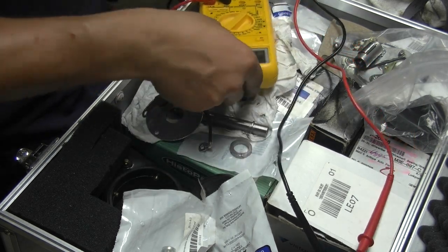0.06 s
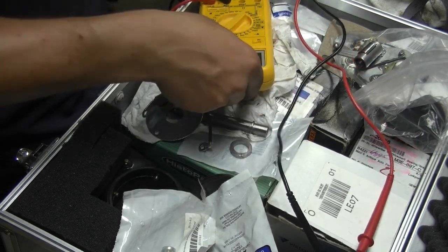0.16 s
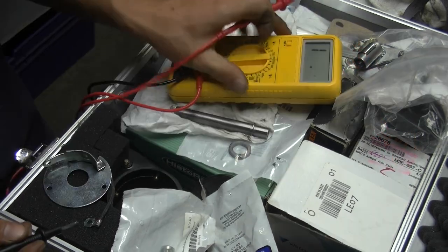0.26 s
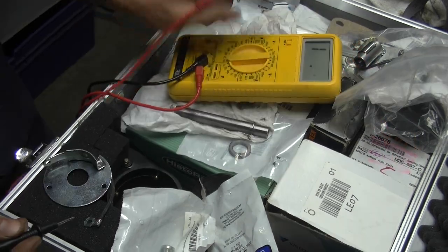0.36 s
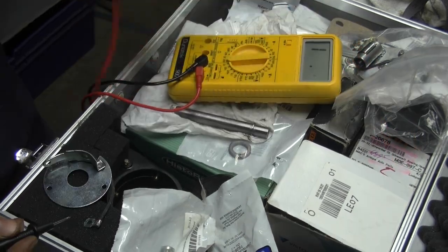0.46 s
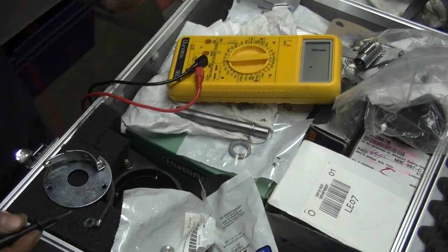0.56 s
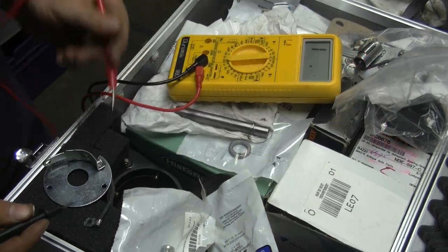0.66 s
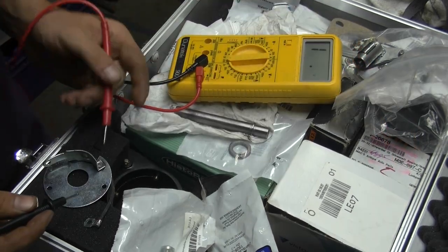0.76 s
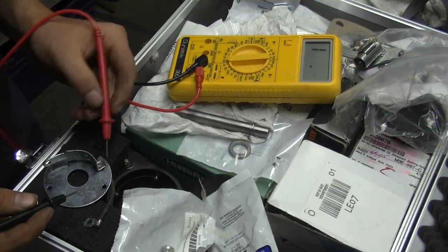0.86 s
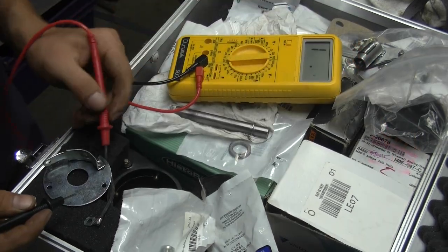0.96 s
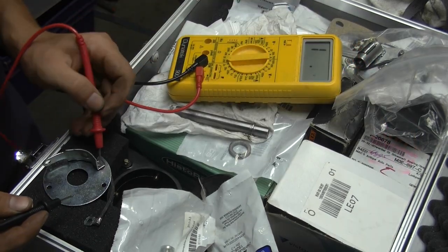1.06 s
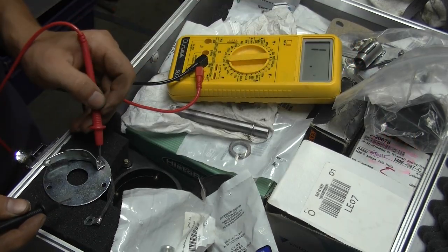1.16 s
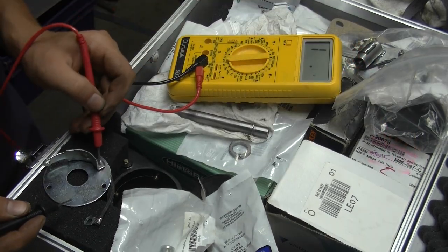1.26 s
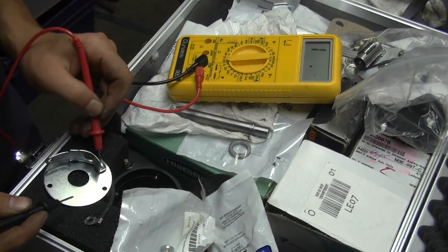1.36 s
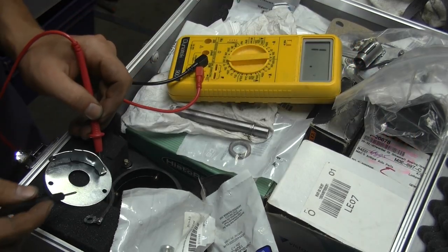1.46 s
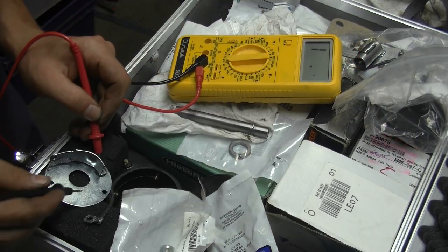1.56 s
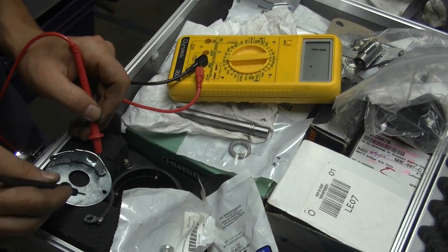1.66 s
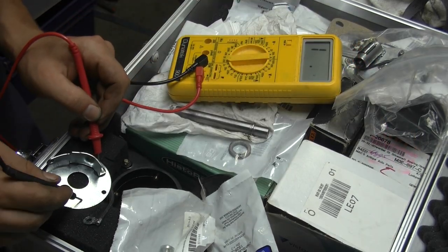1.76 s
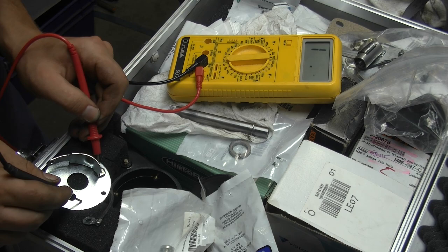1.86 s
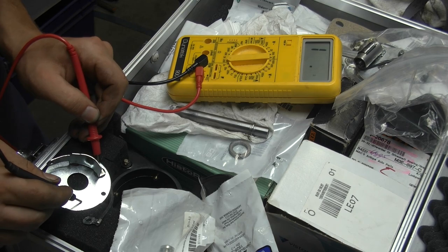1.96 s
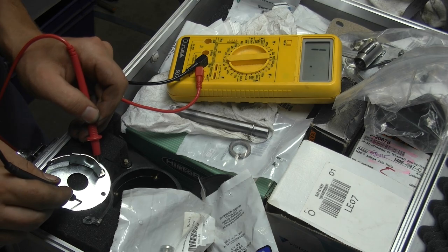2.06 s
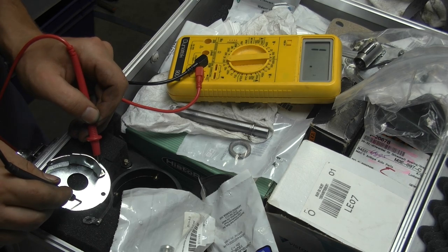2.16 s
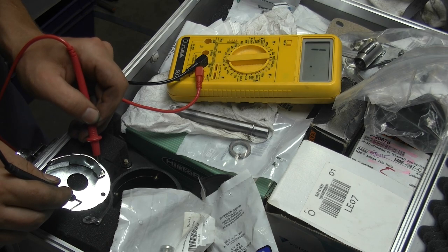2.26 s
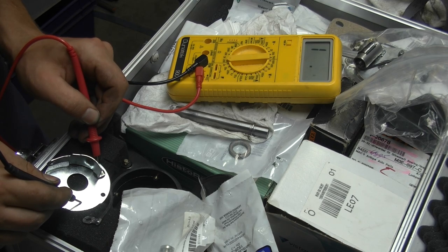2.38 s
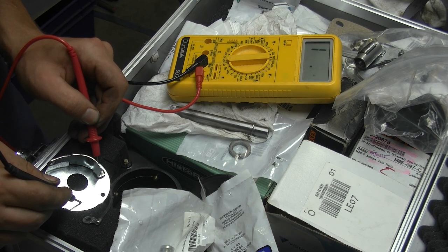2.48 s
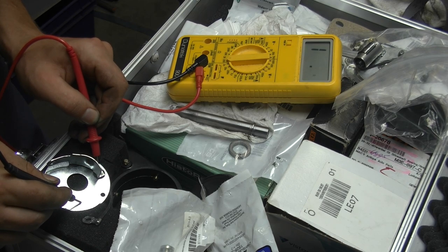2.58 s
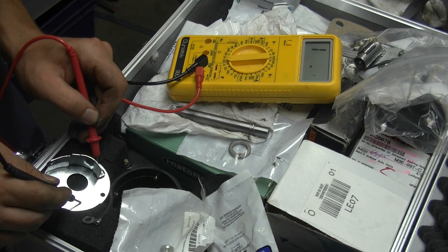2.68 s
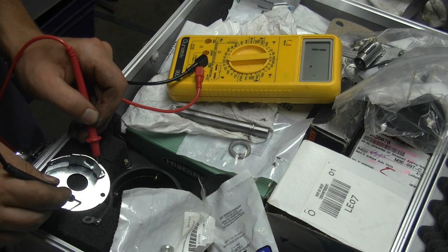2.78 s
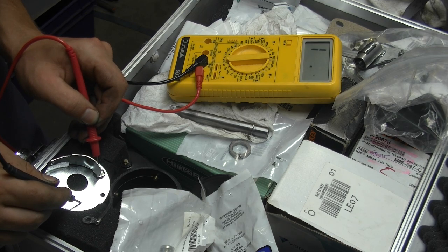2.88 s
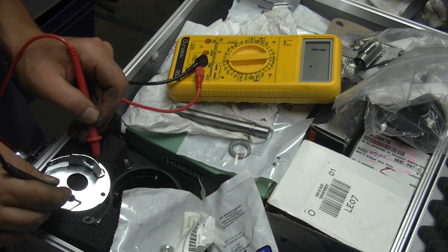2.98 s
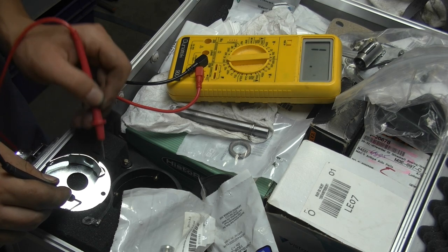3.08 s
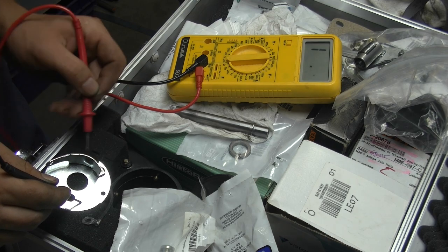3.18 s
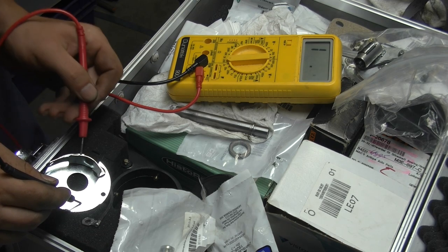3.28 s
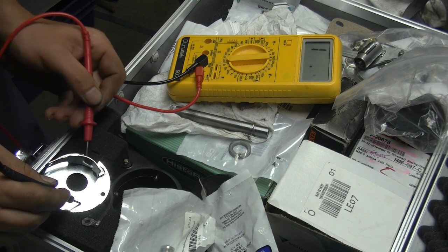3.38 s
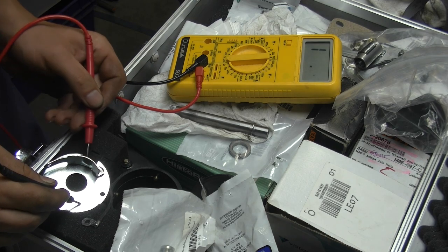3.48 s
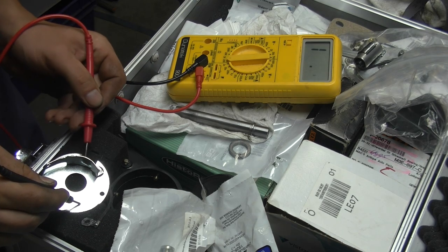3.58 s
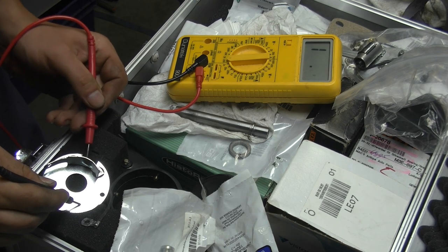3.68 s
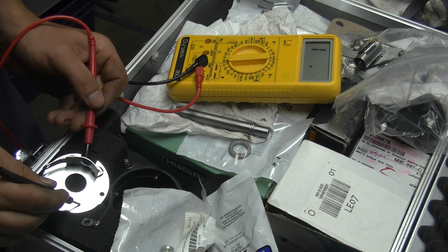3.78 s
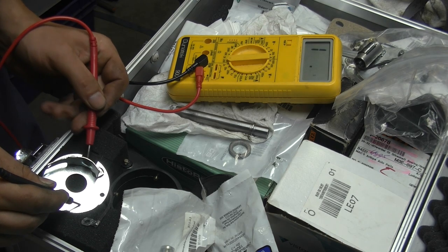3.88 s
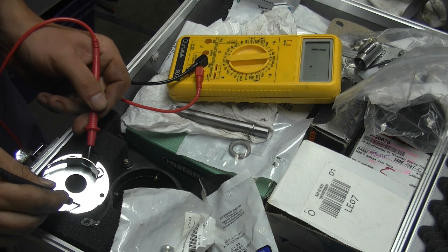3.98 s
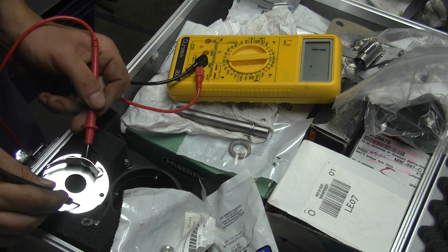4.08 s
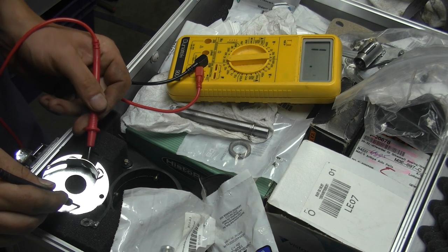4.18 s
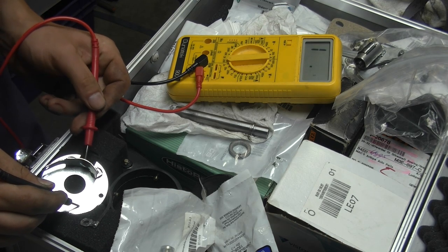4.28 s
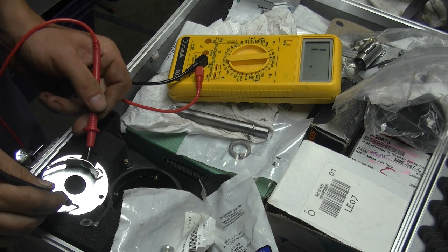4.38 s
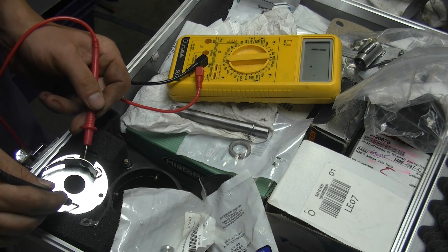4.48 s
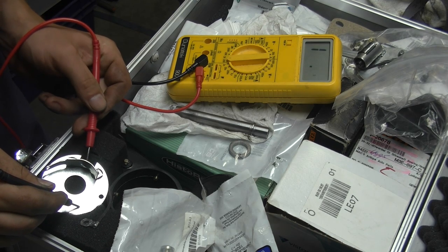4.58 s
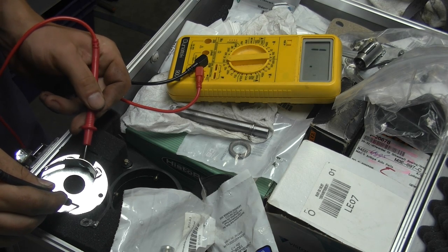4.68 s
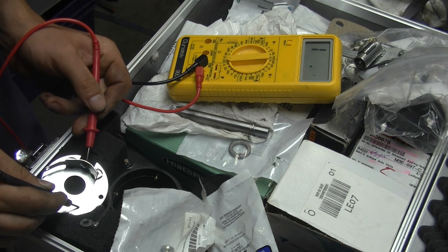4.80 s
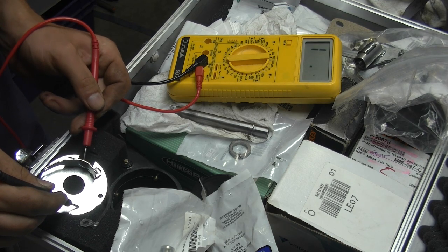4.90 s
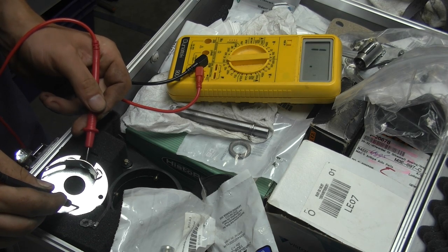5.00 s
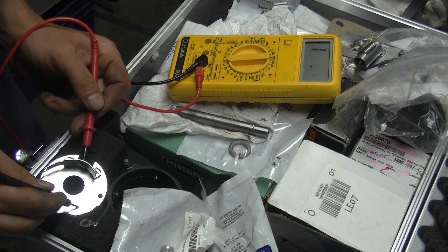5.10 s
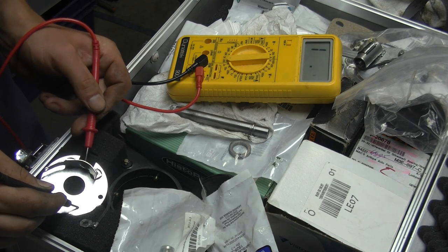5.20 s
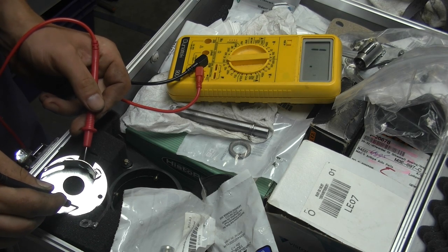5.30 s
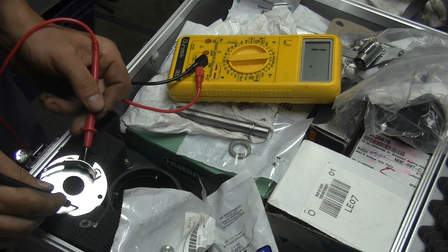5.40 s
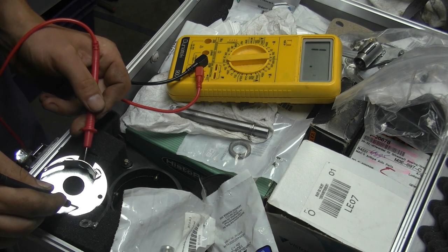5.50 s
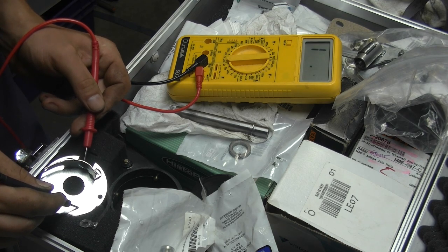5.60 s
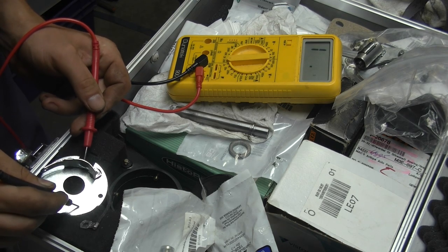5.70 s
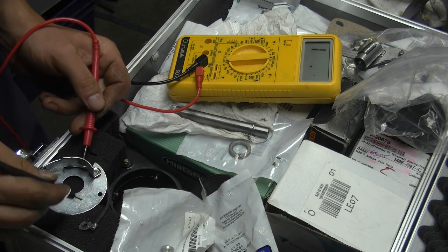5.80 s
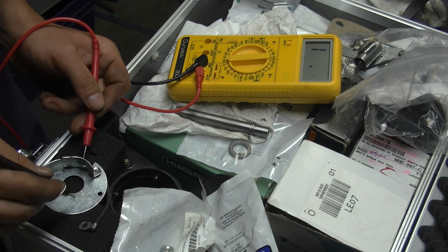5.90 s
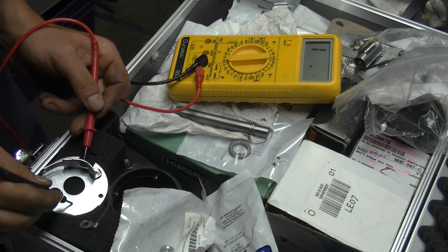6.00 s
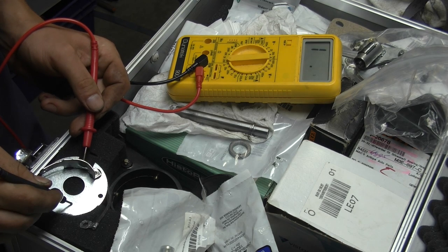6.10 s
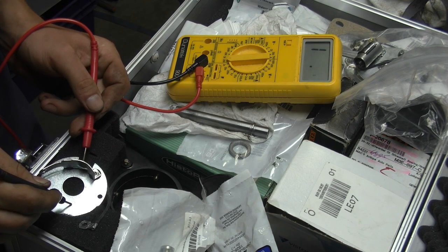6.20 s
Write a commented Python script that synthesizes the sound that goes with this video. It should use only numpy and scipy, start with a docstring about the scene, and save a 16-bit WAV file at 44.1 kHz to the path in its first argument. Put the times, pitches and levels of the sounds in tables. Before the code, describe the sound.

A handheld plastic meter clatters down and rocks to rest on a cluttered case, probe tips tick and scrape on metal, then a sharp snap.

```python
"""First comes a short clatter: a handheld meter is set down on a cluttered tool case and rocks to rest.
Impulses excite damped modes and coloured noise; evenly spaced landings push air, and a loose part ticks.
Two steel probe tips then tap, scrape and fidget on a small metal plate: random slips ring plate, handle
and needle. One loud snap ends it. Plastic knocks, scuffs and rustling accompany the close, nearly mono
scene, in a small room with filtered-noise air that swells slowly and dips at the snap."""
import sys
import numpy as np
from scipy import signal
from scipy.io import wavfile

SR = 44100
rng = np.random.default_rng(int(sys.argv[2]) if len(sys.argv) > 2 else 0)


def put_to_file(sound):
    """Save the sound as 16-bit audio at rate SR, in the file named by the first command-line argument."""
    columns = np.atleast_2d(sound).T  # one column per channel
    safe = np.clip(columns, -1, 1)
    whole_steps = np.round(safe * 32767)
    wavfile.write(sys.argv[1], SR, whole_steps.astype(np.int16))


N = 275625  # samples
T = np.arange(SR // 2) / SR  # time after a blow, s

# Levels are dB re full scale; those of modes and spectra are relative, since energy is normalised later.
# Modes of the meter on the case: pitch_hz [Hz], level_db [dB], t60_s [s]
CASE_MODES = [(248, 1, .26), (425, -6, .08), (501, 1, .12), (608, -12, .2), (705, -11, .09),
              (807, -17, .25), (904, -9, .13), (985, -14, .14), (1150, -8, .07), (1244, -13, .2),
              (1460, -6, .06), (1723, -5, .08), (2350, -7, .04)]
# Modes of its rocking edge: pitch_hz [Hz], level_db [dB], t60_s [s]
EDGE_MODES = [(111, -12, 0.15), (160, -7, 0.16), (271, -1.5, 0.045), (417, -4, 0.079), (516, 2.5, 0.032),
              (600, 3, 0.017), (1145, -16.5, 0.03)]
# Modes of the loose part: pitch_hz [Hz], level_db [dB], t60_s [s]
LOOSE_PART_MODES = [(5010, 4, 0.025), (5740, -4, .01), (6900, -18, 0.0098)]
# Spectrum of the opening clatter: frequency_hz [Hz], density_db [dB per Hz]
CLATTER_SPECTRUM = [(35, -26), (60, -24), (170, -7.5), (209, -7), (289, -1), (381, -15), (491, -7.5),
                    (539, -9), (663, -13.5), (1100, -23), (2470, -26.5), (8420, -38), (15000, -57)]
# Spectrum of the meter's drop: frequency_hz [Hz], density_db [dB per Hz]
THUD_SPECTRUM = [(24, -13), (45, -4), (230, -0.5), (370, -0.5), (500, -3), (1000, -7), (1600, -9.5),
                 (2000, -11), (2600, -11), (3100, -18.5), (4800, -21.5), (5900, -28.5), (8500, -31),
                 (15000, -52)]

# A probe tip touches metal: start_s [s], slide_s [s], plate_db [dB before the plate trim], needle_db [dB]
TIP_CONTACTS = [(0.324, .001, -54, -48), (1.3299, 0.0045, -47, -54), (1.343, 0.0044, -52, -34.5),
                (1.8043, 0.00065, -47, -26), (3.092, 0.0075, -61.5, -51), (3.3177, 0.0009, -47, -64),
                (3.778, 0.004, -51, -58), (3.94, 0.028, -56.5, -55.5), (4.181, 0.021, -55.5, -63),
                (4.2152, 0.0032, -44, -49.5), (4.599, .0068, -59, -54), (4.727, 0.0063, -56, -50.5),
                (5.307, 0.006, -52.5, -60), (5.4037, 0.0065, -47, -52.5), (5.7924, 0.0056, -48, -50),
                (5.8171, 0.0065, -44.5, -37.5)]
# Pressure of one long scrape across the plate: time_s [s], pressure_db [dB before the scrape trim]
SCRAPE_PRESSURE = [(3.31, -68), (3.316, -46.5), (3.394, -62), (3.402, -49), (3.436, -44), (3.466, -51.5),
                   (3.512, -57), (3.53, -73)]
# Modes of the metal plate: pitch_hz [Hz], level_db [dB], t60_s [s]
PLATE_MODES = [(875, -5.5, 0.027), (1390, -3.5, 0.026), (1865, -10, 0.079), (2460, 2.5, 0.012),
               (2833, 3.5, 0.023), (3660, -12, 0.073), (4870, -22, 0.079), (6170, -9.5, 0.035),
               (6800, -8.5, 0.045), (9100, -14, 0.028)]
# Modes of the probe's handle under a tap: pitch_hz [Hz], level_db [dB], t60_s [s]
HANDLE_MODES = [(3364, -9, 0.024), (3526, -3, 0.01), (5000, -21, 0.015)]
# Modes of the steel needle: pitch_hz [Hz], level_db [dB], t60_s [s]
NEEDLE_MODES = [(6120, -16, 0.084), (7200, -2, 0.01), (7150, -31, 0.0043), (7950, 7.5, 0.019),
                (7730, -23, 0.089), (9250, -25, 0.051), (10750, -18, 0.033), (13780, -17, 0.064)]

# Spectrum of the snap's crack: frequency_hz [Hz], density_db [dB per Hz]
CRACK_SPECTRUM = [(60, -20.5), (170, -6.5), (330, 2), (560, -10.5), (1100, -2), (2000, -9.5), (2800, -5.5),
                  (3700, -3.5), (5700, -7), (6250, 1), (9400, -1), (11000, -2), (12000, -16), (16000, -19)]
# Spectrum of the snap's tail: frequency_hz [Hz], density_db [dB per Hz]
SNAP_TAIL_SPECTRUM = [(100, -28.5), (250, -8), (600, -5.5), (2000, -10), (4000, -8), (4700, -1), (6800, 1),
                      (8000, -5), (9400, -5), (11500, -13), (16000, -22)]
# Modes that ring on after the snap: pitch_hz [Hz], level_db [dB], t60_s [s]
SNAP_MODES = [(248, -2, .17), (330, 4, .05), (440, 3, .045), (980, -11, .07), (1150, 4, .025),
              (2790, -1, .09), (4424, -7, .16), (5560, -12, .28), (6300, -9, .24), (6850, -8, .22),
              (8000, -9, .17), (9260, -2, .16), (10900, -10, .1)]

# Handles and plugs knock on the clutter: start_s [s], length_s [s], click_db, thump_db [dB before trim]
PLASTIC_KNOCKS = [(0.1442, 0.0031, -43, -29.5), (0.2286, 0.0012, -42, -46), (.4924, 0.0046, -42, -44),
                  (.758, 0.0048, -36, -32), (0.898, 0.0044, -40.5, -43.5), (5.805, 0.0014, -38, -41.5)]
# Modes of a knocked plastic handle: pitch_hz [Hz], level_db [dB], t60_s [s]
PLASTIC_MODES = [(1494, -1, 0.037), (2250, 5, 0.017), (2830, 3.5, 0.021), (3440, 2, 0.019),
                 (4040, -10, .045)]
# Fingers and leads scuff the bench: start_s [s], length_s [s], rub_db, thump_db [dB before trim]
BENCH_SCUFFS = [(2.74, .016, -52.5, -59), (3.128, .0095, -52, -47.5), (3.74, 0.016, -49, -54),
                (4.742, 0.013, -47.5, -52), (4.782, 0.029, -48.5, -39.5), (5.742, 0.032, -51.5, -51),
                (5.895, .006, -51.5, -70)]
# Sleeve and leads rustle: start_s [s], length_s [s], level_db [dB at start], fade_db_per_s [dB/s]
RUSTLE_MOVES = [(0, 0.228, -36, 52), (0.419, .66, -50.5, 7)]
# Spectrum of rubbing cloth and cable: frequency_hz [Hz], density_db [dB per Hz]
RUSTLE_SPECTRUM = [(20, -9), (70, 0), (130, -3.5), (300, 1.5), (700, -3.5), (2500, -16), (8000, -24),
                   (16000, -49)]

# Decay of the room: frequency_hz [Hz], t60_s [s]
ROOM_DECAY = [(100, 0.68), (400, 0.3), (1000, 0.47), (3000, 0.16), (7000, 0.3), (15000, 0.23)]
# Spectrum of the room's air noise: frequency_hz [Hz], density_db [dB per Hz]
AIR_SPECTRUM = [(12, -32), (20, -5), (38, -11), (65, -9), (91, -6), (142, -0.5), (310, -4), (347, -2.5),
                (2140, -15), (3530, -17.5), (4420, -18.5), (7950, -21), (9670, -22), (14700, -24),
                (16000, -29)]
# Spectrum of the hiss between channels: frequency_hz [Hz], density_db [dB per Hz]
HISS_SPECTRUM = [(30, -18), (120, -15.0), (500, -6), (2000, -13.5), (4000, -9.5), (8000, -7.0),
                 (10500, -3.5), (15500, -11.5)]

# The rocking keeps its swing for a while, then dies away; one landing (counted from 0) is hardest.
ROCK_START_S, ROCK_PERIOD_S, ROCK_HOLD_S, ROCK_FADE_DB_PER_S = 0.3725, 0.076, 0.35, 43
PUSH_PEAK_DB, LANDING_DB, HARDEST_LANDING, HARDEST_EXTRA_DB = -18.5, -29.5, 4, 4.5
# The loose part ticks between landings, loudest near the peak time.
RATTLE_START_S, RATTLE_PERIOD_S = 0.4055, 0.0747
RATTLE_DB, RATTLE_PEAK_S, RATTLE_FADE_DB_PER_S = -41.5, 0.48, 69
HANDLE_DB = -2.5  # relative to the plate
FIDGET_FROM_S, FIDGET_TO_S, FIDGET_SLIDE_S = 3.82, 5.3, 0.017
FIDGET_DB = -58.5  # before the plate trim
KNOCK_HZ, KNOCK_HISS_DB = 2390, -13.5  # centre of the click; hiss relative to it
SCUFF_HZ, SCUFF_HISS_DB = 2810, -2  # centre of the rub; hiss relative to it
SCUFF_DULLING = 0.55  # dB of hiss lost per dB by which the thump exceeds the rub
SNAP_S = 6.0288
# AIR_DB is the level before the swell and the dip.
AIR_DB, SWELL_DB, SWELL_FROM_S, SWELL_TO_S = -55, 6, 2.35, 4.48
DIP_DB, DIP_RECOVER_S = 14.5, 0.35  # recovery is an exponential time constant
EDGE_HZ = 16200  # upper limit of the band


def meter(clatter_db=-21, thud_db=-16, case_db=-19.0, settle_db=-24):
    """Impact excitation: clutter rings as the meter is lifted, then it drops with a quick second contact."""
    out = np.zeros(N)
    clatter = colour(burst(0.16) + 0.5 * burst(0.3), CLATTER_SPECTRUM)
    add(out, 0, sized(clatter, clatter_db))
    blow = 0.25 * signal.unit_impulse(len(T)) + burst(0.05)
    add(out, 0.2612, sized(colour(blow, THUD_SPECTRUM), thud_db))
    add(out, 0.2612, sized(ring(CASE_MODES), case_db))
    settling = burst(0.027) + 0.7 * burst(0.42)
    add(out, 0.2712, sized(colour(settling, THUD_SPECTRUM), settle_db))
    return out


def air_push(lead_s=0.0051, squeeze_s=0.0028, rebound=0.27, sway_hz=52, sway_t60=0.038):
    """Displaced air: a pressure hump just before landing, then a damped rebound; landing is at t = 0."""
    t = T - 0.05
    hump = np.exp(-((t + lead_s) / squeeze_s) ** 2)
    sway = (t > 0) * gain_of(-60 * abs(t) / sway_t60) * np.sin(2 * np.pi * sway_hz * t)
    push = band(hump - rebound * sway, 13.0, 400, order=1)
    return t[0], push / abs(push).max()


def rocking(roll_s=0.0059, count=9):
    """Periodic impacts: each landing squeezes out air and knocks, and a loose part ticks in between."""
    out = np.zeros(N)
    push_offset_s, push = air_push()
    for k, s in enumerate(ROCK_START_S + ROCK_PERIOD_S * np.arange(count)):
        swing_db = -ROCK_FADE_DB_PER_S * max(s - ROCK_START_S - ROCK_HOLD_S, 0)
        knock_db = LANDING_DB + swing_db + HARDEST_EXTRA_DB * (k == HARDEST_LANDING)
        add(out, s + push_offset_s, gain_of(PUSH_PEAK_DB + swing_db) * push)
        # the edge rolls down over crumpled bags
        edge = signal.unit_impulse(len(T)) + 1.2 * unit(slips(roll_s))
        knock = through(edge, ring(EDGE_MODES)) + 0.5 * unit(band(burst(0.065), 304, 680))
        add(out, s, sized(knock, knock_db))
    for s in RATTLE_START_S + RATTLE_PERIOD_S * np.arange(count // 2):
        tick = through(unit(slips(0.0024)), ring(LOOSE_PART_MODES))
        tick = tick + 0.77 * unit(band(burst(0.016), 1300, 6600))
        tick_db = RATTLE_DB - RATTLE_FADE_DB_PER_S * abs(s - RATTLE_PEAK_S)
        add(out, s, sized(tick, tick_db))
    return out


def probes(plate_trim_db=2):
    """Stick-slip into resonators: the same slips ring plate, handle and needle, each with a dry tick."""
    out = np.zeros(N)
    plate = ring(PLATE_MODES) + 0.33 * unit(band(burst(0.015), 1500, 3300))
    handle = ring(HANDLE_MODES) + 0.35 * unit(band(burst(0.008), 1800, 4200))
    needle = ring(NEEDLE_MODES) + 0.19 * unit(band(burst(0.04), 4200, 11000))
    for s, slide_s, press_db, needle_db in TIP_CONTACTS + fidgets():
        drive = slips(slide_s)
        plate_db = press_db + plate_trim_db
        for body, db in [(plate, plate_db), (handle, plate_db + HANDLE_DB), (needle, needle_db)]:
            add(out, s, sized(through(drive, body), db, slide_s))
    return out + scrape(needle)


def fidgets(count=14):
    """Intermittent friction: the held tip slips faintly at uneven times, as rows like TIP_CONTACTS."""
    step = (FIDGET_TO_S - FIDGET_FROM_S) / count
    rows = []
    for k, (when, slide) in enumerate(rng.random((count, 2))):
        start_s = FIDGET_FROM_S + (k + when) * step
        rows.append((start_s, FIDGET_SLIDE_S * (0.5 + slide), FIDGET_DB, FIDGET_DB))
    return rows


def scrape(needle, trim_db=1, needle_db=-9, per_s=1300):
    """Sliding friction: a stream of slips follows the tip's pressure and rings mostly the plate."""
    times, pressure_db = np.transpose(SCRAPE_PRESSURE)
    chance = per_s / SR
    grains = rng.standard_normal(N) * (rng.random(N) < chance) / np.sqrt(chance)
    pressure = np.interp(np.arange(N) / SR, times, gain_of(pressure_db + trim_db), left=0, right=0)
    return through(grains * pressure, ring(PLATE_MODES) + gain_of(needle_db) * unit(needle))


def snap(crack_db=-14.0, tail_db=-32, plate_db=-32, ring_db=-30, ring_room=0.3):
    """Broadband excitation: a hard crack at the tip rings plate and case, and leaves a bright tail."""
    out = np.zeros(N)
    crack = 0.39 * signal.unit_impulse(len(T)) + band(burst(0.019), 1230, 20000)
    add(out, SNAP_S, sized(colour(crack, CRACK_SPECTRUM), crack_db))
    add(out, SNAP_S, sized(colour(burst(0.43), SNAP_TAIL_SPECTRUM), tail_db))
    add(out, SNAP_S, sized(ring(PLATE_MODES), plate_db))
    ringing = ring(SNAP_MODES)
    add(out, SNAP_S, sized(ringing + ring_room * room(ringing), ring_db))
    return out


def handling(trim_db=-1.5, plastic_db=-5):
    """Contact noise: knocks click and ring the plastic; scuffs only rub, duller where the thump dominates."""
    out = np.zeros(N)
    for s, length_s, click_db, thump_db in PLASTIC_KNOCKS:
        add(out, s, chatter(length_s, KNOCK_HZ, thump_db, click_db, click_db + KNOCK_HISS_DB))
        ringing = through(slips(length_s), ring(PLASTIC_MODES))
        add(out, s, sized(ringing, click_db + plastic_db, length_s))
    for s, length_s, rub_db, thump_db in BENCH_SCUFFS:
        hiss_db = rub_db + SCUFF_HISS_DB - SCUFF_DULLING * max(thump_db - rub_db, 0)
        add(out, s, chatter(length_s, SCUFF_HZ, thump_db, rub_db, hiss_db))
    return gain_of(trim_db) * out


def chatter(length_s, hz, low_db, middle_db, high_db, swell=0.29, die=0.99, shortest_s=0.00057, spread=1.51):
    """Three-band noise for soft contact: brief ones start sharply, long ones swell and fade."""
    attack = 1 - np.exp(-T / (swell * length_s))
    shape = attack * np.exp(-T / (die * length_s + shortest_s))
    bands = [(240, 1450, low_db), (hz / spread, hz * spread, middle_db), (4200, 8600, high_db)]
    out = np.zeros(len(T))
    for lo, hi, db in bands:
        out += sized(band(shape * rng.standard_normal(len(T)), lo, hi, order=3), db, length_s)
    return out


def rustle(release_s=0.03):
    """Friction noise of cloth and cable: each move fades slowly, then stops."""
    out, t = np.zeros(N), np.arange(N) / SR
    for s, length_s, db, fade_db_per_s in RUSTLE_MOVES:
        shape = gain_of(db - fade_db_per_s * t) * np.exp(-np.maximum(t - length_s, 0) / release_s)
        rubbing = np.sqrt(N) * unit(colour(rng.standard_normal(N), RUSTLE_SPECTRUM))
        add(out, s, shape * rubbing)
    return out


def room(x, build_s=0.0034):
    """Diffuse reverberation: convolution with a noise tail whose bands each decay at their own rate."""
    hz, t, z = signal.stft(rng.standard_normal(len(T)), SR, nperseg=256)
    decay = gain_of(-60 * t / read(ROOM_DECAY, hz)[:, None])
    tail = signal.istft(z * decay, SR, nperseg=256)[1][:len(T)]
    return through(x, unit(tail * (1 - np.exp(-T / build_s))))


def air(waver_db=1.22, rumble_db=-61):
    """Filtered noise that swells slowly, dips at the snap, recovers and wavers slightly, over deep rumble."""
    t = np.arange(N) / SR
    knots = np.linspace(0, t[-1], num=90)
    waver = waver_db * np.interp(t, knots, rng.standard_normal(len(knots)))
    noise = unit(colour(rng.standard_normal(N), AIR_SPECTRUM))
    rumble = unit(band(rng.standard_normal(N), 10.96, 15.8, order=4))
    level_db = AIR_DB + air_swell() + waver
    return np.sqrt(N) * (gain_of(level_db) * noise + gain_of(rumble_db) * rumble)


def air_swell():
    """Slow level modulation in dB: one rise, then a dip at the snap that recovers exponentially."""
    t = np.arange(N) / SR
    rise = np.clip((t - SWELL_FROM_S) / (SWELL_TO_S - SWELL_FROM_S), 0, 1)
    dip = (t > SNAP_S) * np.exp(-abs(t - SNAP_S) / DIP_RECOVER_S)
    return SWELL_DB * rise - DIP_DB * dip


def ring(modes):
    """Modal superposition: exponentially damped sines, neighbours swinging in opposite senses."""
    out = np.zeros(len(T))
    for k, (hz, db, t60) in enumerate(modes):
        out += (-1) ** k * gain_of(db - 60 * T / t60) * np.sin(2 * np.pi * hz * T)
    return unit(out)


def burst(t60):
    """Exponentially decaying noise of energy 1, a dense dying chatter."""
    return unit(rng.standard_normal(len(T)) * gain_of(-60 * T / t60))


def slips(slide_s, per_s=4000, release_s=0.0045, touch=2.8):
    """Stick-slip excitation: a first touch, then tiny uneven slips that die away after the slide."""
    grains = rng.standard_normal(len(T)) * (rng.random(len(T)) < per_s / SR)
    grains *= np.exp(-np.maximum(T - slide_s, 0) / release_s)
    grains *= np.minimum(slide_s / 0.0066, 1) ** 2  # short slides slip more weakly
    grains[0] = touch
    return grains


def gain_of(db):
    """Logarithmic level: decibels to amplitude."""
    return 10 ** (np.asarray(db) / 20)


def unit(x):
    """Energy normalisation: scales a sound to energy 1."""
    return x / np.sqrt(np.sum(x ** 2) + 1e-20)


def sized(x, db, length_s=0):
    """Energy as power times duration: a steady level db held for the length plus 10 ms."""
    return gain_of(db) * unit(x) * np.sqrt((length_s + 0.01) * SR)


def read(points, hz):
    """Linear interpolation of a table on a logarithmic frequency axis."""
    f, value = np.transpose(points)
    return np.interp(np.log(hz + 1), np.log(f + 1), value)


def add(mix, s, sound):
    """Superposition: adds a sound into the mix at s seconds, cut at the end."""
    part = mix[round(s * SR):][:len(sound)]
    part += sound[:len(part)]


def through(x, response):
    """Linear response: convolution with an impulse response."""
    return signal.fftconvolve(x, response)[:len(x)]


def colour(x, spectrum, size=8192):
    """Minimum-phase filtering: the Hilbert transform of the log gain gives a causal response."""
    log_gain = np.log(gain_of(read(spectrum, abs(np.fft.fftfreq(size, 1 / SR)))))
    response = np.fft.ifft(np.exp(np.conj(signal.hilbert(log_gain)))).real
    return through(x, response[:size // 2])


def band(x, lo_hz, hi_hz, order=2):
    """Butterworth band-pass filtering."""
    edges_hz = [lo_hz, min(hi_hz, SR / 2 - 100)]
    return signal.sosfilt(signal.butter(order, edges_hz, "band", fs=SR, output="sos"), x)


def scene(bench_room_db=-12, rock_room_db=-19, probe_room_db=-21, wide_room_db=-36, hiss_db=-69.5):
    """Mid-side stereo: sources in the middle; a trace of room and a faint hiss differ between channels."""
    bench, rocks, tips, crack = meter() + handling() + rustle(), rocking(), probes(), snap()
    to_room = gain_of(bench_room_db) * bench + gain_of(rock_room_db) * rocks + gain_of(probe_room_db) * tips
    mid = bench + rocks + tips + crack + air() + room(to_room)
    hiss = np.sqrt(N) * unit(colour(rng.standard_normal(N), HISS_SPECTRUM))
    side = gain_of(hiss_db + air_swell()) * hiss  # the hiss swells and dips with the air
    side += gain_of(wide_room_db) * room(band(bench + rocks + tips + crack, 1900, 12000, order=1))
    return np.array([mid + side, mid - side])


def record(dry):
    """Hard clipping at full scale, then a linear-phase band limit."""
    low_pass = signal.firwin(255, EDGE_HZ, window=("kaiser", 9), fs=SR)
    return signal.oaconvolve(np.clip(dry, -1, 1), low_pass[None], "same")


dry = scene()
out = record(dry)
put_to_file(out)
```